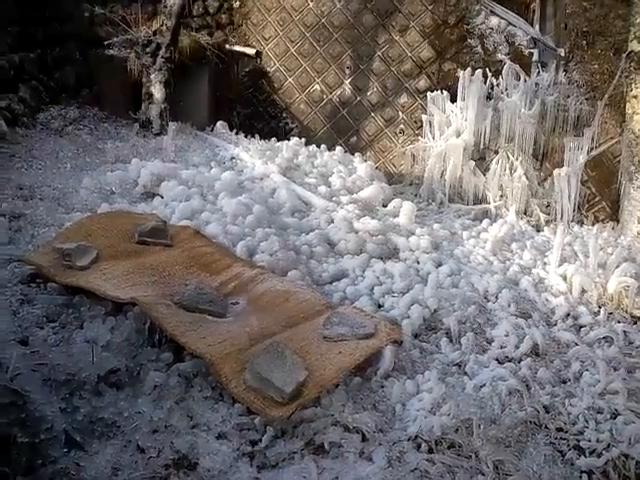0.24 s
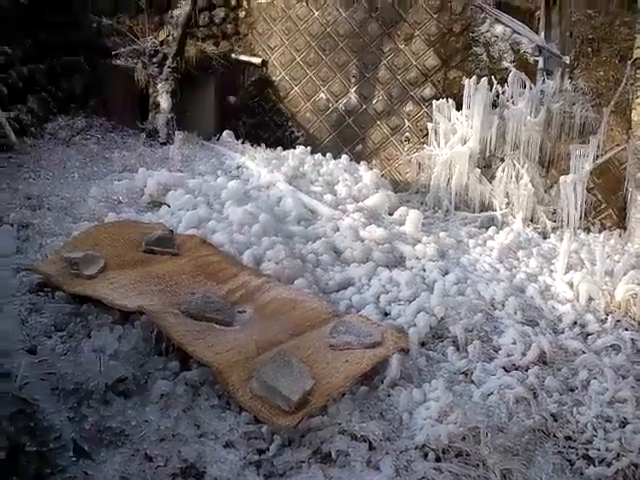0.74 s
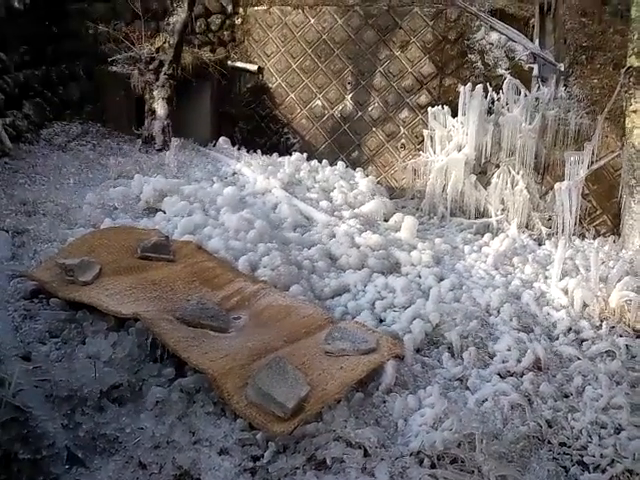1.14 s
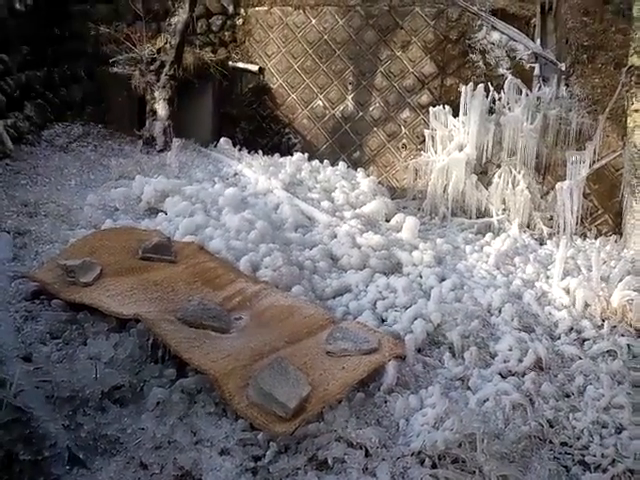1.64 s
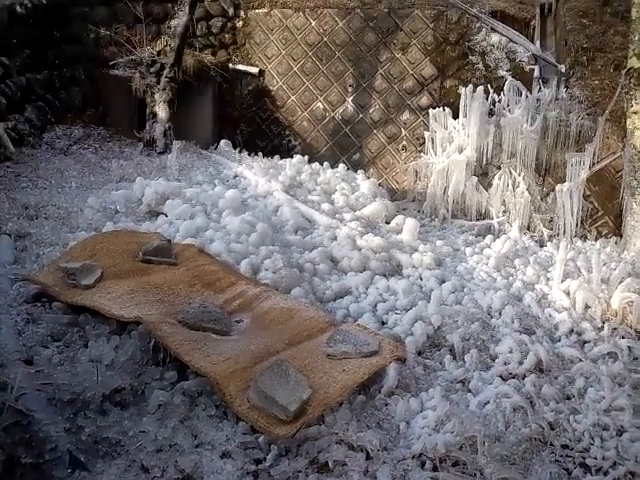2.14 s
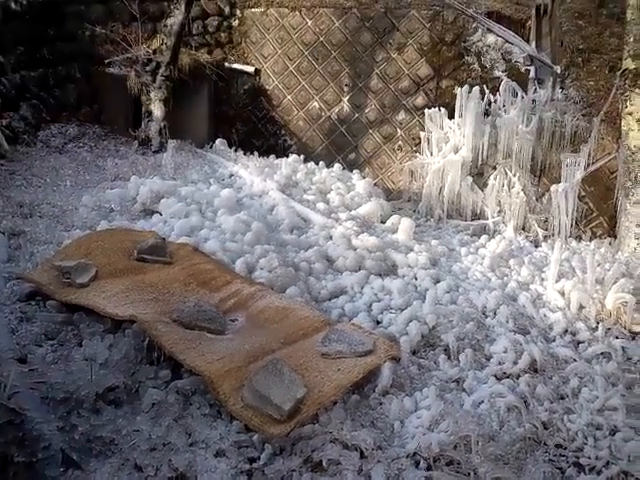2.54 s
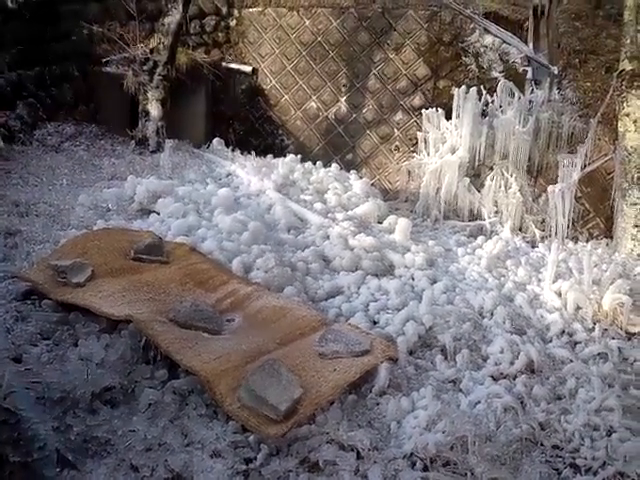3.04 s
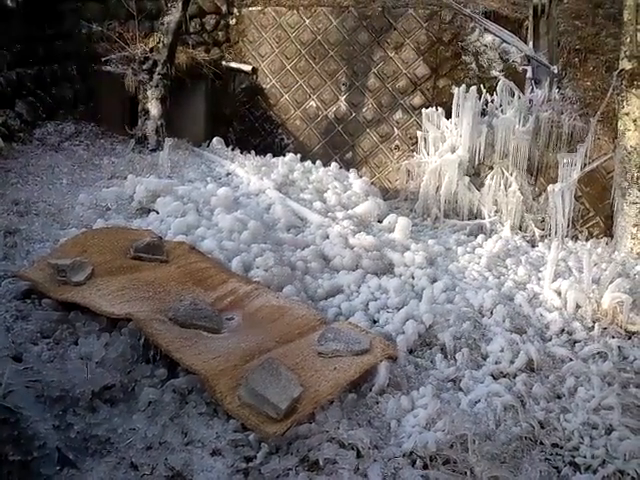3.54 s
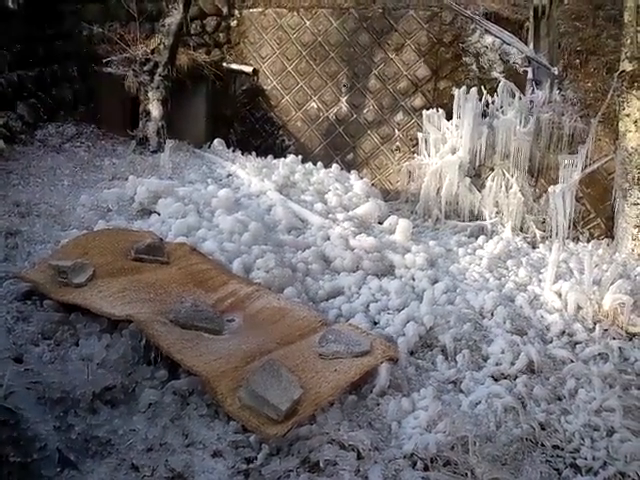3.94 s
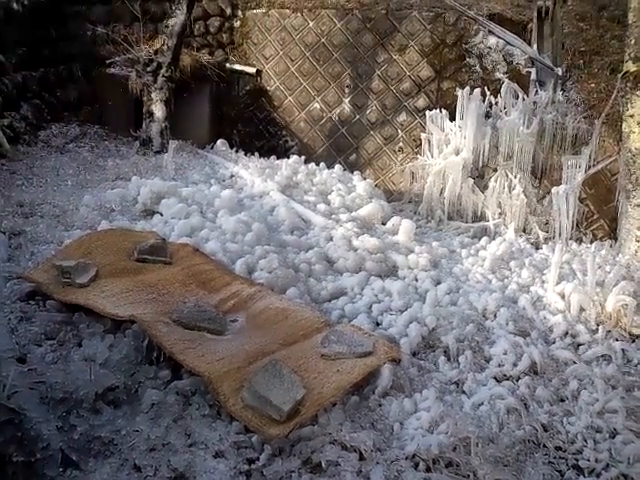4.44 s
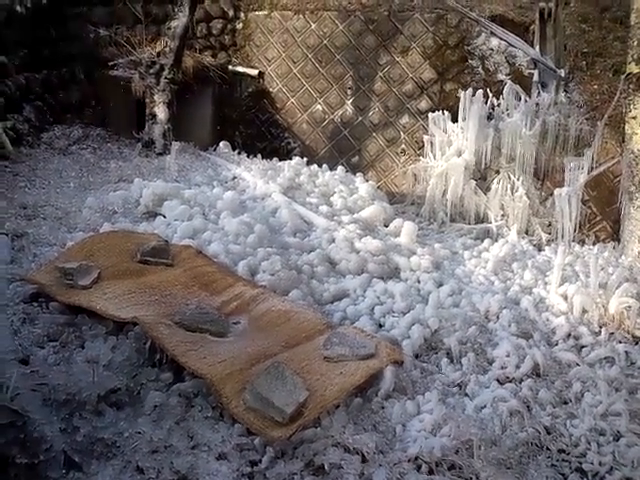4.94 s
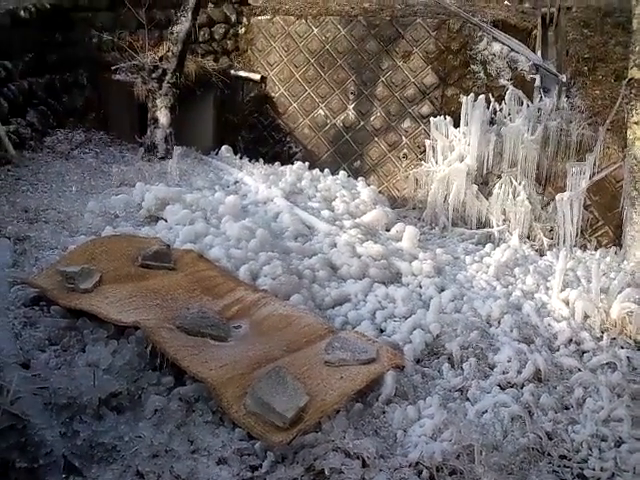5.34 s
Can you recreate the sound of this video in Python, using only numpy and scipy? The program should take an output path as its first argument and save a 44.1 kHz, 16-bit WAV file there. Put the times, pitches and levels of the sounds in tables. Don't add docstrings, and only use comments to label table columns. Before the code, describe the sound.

Pressurised water hisses steadily from a leaking pipe outdoors, bright and slightly glittery, with a few dull handling knocks and late wind buffeting.

```python
import sys
import numpy as np
from scipy import signal
from scipy.io import wavfile
from scipy.ndimage import uniform_filter1d

SR = 44100
rng = np.random.default_rng(int(sys.argv[2]) if len(sys.argv) > 2 else 0)


def boost(x):
    u = np.asarray(x, float) / 20
    return 10 ** u


def wav_out(sig):
    wavfile.write(sys.argv[1], SR, np.round(np.clip(np.atleast_2d(sig).T, -1, 1) * 32767).astype(np.int16))


N = 246519


def evened(x):
    return x / np.sqrt(np.mean(x ** 2) + 1e-20)


def read(points, hz):
    f, value = np.transpose(points)
    return np.interp(np.log(hz + 1), np.log(f + 1), value)


def over_time(table):
    s, level_db = np.transpose(table)
    return boost(np.interp(np.arange(N) / SR, s, level_db))


def fluctuation(count, size):
    return evened(uniform_filter1d(rng.standard_normal(count), size=size))


def noise(field_db, size=1024):
    t = np.arange(4 * N // size + 5) * size / 4 / SR
    hz = np.fft.rfftfreq(size, 1 / SR)
    real, imaginary = rng.standard_normal((2, len(hz), len(t)))
    lines = (real + 1j * imaginary) * boost(field_db(hz, t))
    _, sound = signal.istft(lines, nperseg=size, noverlap=size - size // 4)
    return evened(sound[:N])


def jet(patchy_db=0.5, sputter_db=-0.01, waver_db=0.78, trim_db=0.34):
    # t/s, level/dB
    jet_pressure = [(0.0, -30), (0.35, -31.5), (0.7, -32), (1.0, -32), (1.25, -32.5), (1.482, -32),
                    (1.509, -31.5), (1.79, -34), (1.978, -31), (2.267, -33.5), (2.441, -30.5), (3.109, -33),
                    (3.221, -32), (4.589, -33.5), (4.66, -34.5), (4.789, -30.5), (4.921, -33), (5.59, -30)]
    # f/Hz, density/dB
    jet_colour = [(120, -38), (350, -26), (700, -17.5), (1100, -15.5), (1600, -8.5), (2500, -4.5),
                  (4000, -4.5), (5700, -1), (7000, -6), (8000, 0), (9000, -31.5)]
    # f/Hz, width/Hz, level at the start/dB, level at the end/dB
    echo_comb = [(478, 120, -0.5, -6), (653, 53, -6.5, -4), (817.6, 110, -4, -6.5),
                 (1119.7, 100, -6.5, -5.5), (1408, 90, -0.5, -4), (1782, 120, -4, 0), (2155, 100, -7.5, -3),
                 (2370, 70, -7.5, 2.5), (2529, 110, 4.5, 7), (2834, 90, -2, 2.5), (3088, 170, -8.5, -8),
                 (3368, 110, 2.5, 3.5), (3815, 47, -2, -20), (3931, 160, -6, -6), (4070, 60, 1, -5.5),
                 (4283, 73, 3.5, -0.5), (4570, 66, -2.5, -5), (4840, 57, -6, -11.5), (5127, 150, 4.5, 3.5),
                 (5187, 43, -2.5, -3.5), (5310, 150, -3.5, -3.5), (5660, 170, 2.5, 1), (5920, 110, 2, 3.5),
                 (6010, 190, -5.5, 0.5), (6230, 110, 0.5, -0.5), (6190, 57, 5.5, -2), (6330, 79, -2, -0.5),
                 (6260, 120, 0.5, 2.5), (6438, 230, -1.5, -5), (6676, 87, 2, 3.5), (6860, 83, -9, -7),
                 (6970, 86, 5, 3.5), (6990, 78, -5.5, -1.5), (7120, 40, -3.5, 5.5), (7297, 120, -4, -7.5),
                 (7510, 100, 5, 2), (7690, 60, 0, -2.5), (7540, 64, -5, -0.5), (7780, 160, 1.5, -2.5)]
    body_follows, fizz_follows = 0.27, 0.75
    s, level_db = np.transpose(jet_pressure)

    def field_db(hz, t):
        drift = np.clip((t - 1.9) / 1.5, 0, 1)
        comb = 0
        for f, width, first_db, last_db in echo_comb:
            bump = np.exp(-(2 * (hz - f) / width) ** 2)
            comb = comb + np.outer(bump, first_db + (last_db - first_db) * drift)

        change_db = np.interp(t, s, level_db - level_db.mean())
        body = 1 / (1 + (hz / 3000) ** 8)
        fizz = 1 / (1 + (6500 / (hz + 1)) ** 16)
        steadier = np.outer((body_follows - 1) * body + (fizz_follows - 1) * fizz, change_db)

        waver = np.outer(fizz, fluctuation(len(t), 8))
        chance = rng.standard_normal((len(hz), len(t)))
        across_pitch = uniform_filter1d(chance, size=10, axis=0)
        patches = evened(uniform_filter1d(across_pitch, size=14, axis=1))
        sputter = fluctuation(len(t), 4)
        unsteady = waver_db * waver + patchy_db * patches + sputter_db * sputter
        return read(jet_colour, hz)[:, None] + comb + steadier + unsteady

    return over_time(jet_pressure) * boost(trim_db) * noise(field_db, size=2048)


def yard():
    # f/Hz, density/dB
    yard_colour = [(25, -5), (55, -5), (90, -13), (130, -3), (220, -1.5), (450, -7.5), (900, -15),
                   (1300, -37.5)]
    return boost(-52.5) * noise(lambda hz, t: read(yard_colour, hz)[:, None])


def wind(lumpy_db=2.5):
    # t/s, level/dB
    gusts = [(0.0, -63.5), (0.53, -57.5), (1.38, -57.5), (1.6, -65), (2.57, -62.5), (3.1, -51.5),
             (3.6, -44.5), (4.1, -41.5), (4.7, -47), (5.0, -53.5), (5.59, -41)]
    # f/Hz, density/dB
    wind_colour = [(15, -2), (35, 0.5), (55, 5.5), (100, -5.5), (200, -15.5), (400, -22.5), (900, -48)]

    def field_db(hz, t):
        return read(wind_colour, hz)[:, None] + lumpy_db * fluctuation(len(t), 5)

    return over_time(gusts) * noise(field_db)


def add(mix, s, db, hz, rise_s, t60_s, direction):
    near = slice(round((s - .05) * SR), round((s + .15) * SR))
    u = (np.arange(N) / SR)[near] - s
    rise = np.exp(-(u / rise_s) ** 2 / 2)
    decay = boost(-60 * u / t60_s)
    shape = np.where(u < 0, rise, decay)
    mix[near] += np.sign(direction) * boost(db) * shape * np.cos(2 * np.pi * hz * u)


def knocks():
    # crest t/s, crest level/dB, f/Hz, push direction/sign
    finger_knocks = [(0.3070, -36, 397, 1), (0.3270, -22, 348, -1), (0.3303, -21.5, 114, 1),
                     (2.770, -32, 296, -1), (2.7716, -29, 300, 1), (2.7856, -29.5, 520, 1),
                     (2.7915, -33, 330, 1), (2.8074, -28, 330, -1), (2.8100, -21.5, 200.7, 1),
                     (2.8115, -17, 355, -1), (2.8163, -29.5, 1150, -1), (2.8163, -14, 677, -1),
                     (2.8245, -22, 218.6, -1), (2.8287, -28, 788, 1), (2.8311, -23.5, 329, -1),
                     (2.833, -28.5, 925, 1), (2.8341, -22.5, 97.3, 1), (2.8361, -26.5, 400, 1),
                     (2.837, -24.5, 301, -1), (2.8425, -22, 380, -1), (2.8463, -25, 130, 1),
                     (2.8485, -23.5, 451, 1), (2.8489, -27.5, 603, -1), (2.85, -24, 240, -1),
                     (2.853, -19.5, 310, 1), (4.8774, -35, 250, 1), (4.8877, -31, 497, -1),
                     (4.8926, -33.5, 200, -1), (4.9132, -26, 480, 1), (4.921, -14, 409.7, -1),
                     (4.9203, -24.5, 850, -1), (4.9232, -19.5, 123, 1), (5.450, -28.5, 106.5, 1),
                     (5.5818, -23.5, 292, 1), (5.5843, -20.5, 167.7, -1), (5.5905, -25, 149.2, -1)]
    rise_turns, ring_turns = 0.34, 2.1
    out = np.zeros(N)
    for s, db, hz, direction in finger_knocks:
        add(out, s, db, hz, rise_turns / hz, ring_turns / hz, direction)
    return out


def rings():
    # crest t/s, crest level/dB, f/Hz, t60/ms
    ringing_taps = [
        (0.307, -40, 377, 20),
        (2.779, -31, 621, 50),
        (2.8030, -31, 840, 20),
        (2.816, -22, 686, 22),
        (4.055, -33.5, 250, 20),
        (5.359, -37, 325, 12),
        (5.363, -40.5, 801, 11),
        (5.3655, -28.5, 191.3, 15),
        (5.3706, -22, 171.6, 120),
        (5.5845, -40, 418, 30),
    ]
    rise_turns = .7
    out = np.zeros(N)
    for s, db, hz, t60_ms in ringing_taps:
        add(out, s, db, hz, rise_turns / hz, t60_ms / 1000, 1)
    return out


def bumps():
    # crest t/s, crest level/dB, f/Hz
    housing_bumps = [(0.566, -33.5, 114.6), (0.795, -33.5, 113.7), (1.151, -31, 134.4), (1.228, -30.5, 133),
                     (1.3375, -36, 123), (1.418, -38, 131), (1.488, -32.5, 126), (2.692, -36, 116),
                     (3.376, -32, 115), (3.533, -42, 78.3), (3.712, -32, 57.6), (3.811, -23.5, 80.2),
                     (3.998, -29, 61.3), (4.029, -21, 95.6), (4.067, -26, 195.6), (4.091, -31.5, 133),
                     (4.099, -32.5, 167.6), (4.120, -27.5, 81), (4.136, -36, 151), (4.221, -33, 165.7),
                     (4.294, -34, 189), (4.156, -26.5, 68.6), (4.1885, -24, 100), (4.27, -28.5, 113),
                     (4.388, -40, 90.5), (4.438, -33.5, 68), (4.498, -31, 55), (4.576, -30, 100.5),
                     (4.685, -29.5, 58.6)]
    rise_turns, ring_turns = .48, 3.2
    out = np.zeros(N)
    for s, db, hz in housing_bumps:
        add(out, s, db, hz, rise_turns / hz, ring_turns / hz, -1)
    return out


def rubs(grain_db=10.0):
    # start t/s, length/s, level/dB
    rub_strokes = [
        (2.764, 0.043, -42),
        (4.864, 0.049, -50),
        (5.335, 0.037, -52),
    ]
    # f/Hz, density/dB
    rub_colour = [(60, -24), (250, 0), (600, -0.5), (1100, -13), (1600, -19), (3000, -45)]
    t = np.arange(N) / SR
    stroke = np.zeros(N)
    for s, length, db in rub_strokes:
        stroke += boost(db) * np.sin(np.pi * np.clip((t - s) / length, 0, 1))
    grain = boost(grain_db * fluctuation(N, 120))
    return stroke * grain * noise(lambda hz, t: read(rub_colour, hz)[:, None])


def scene():
    mix = jet() + yard() + wind() + knocks() + rings() + bumps() + rubs()
    return mix[None]


def coarse_step(lines, band_widths):
    # f/Hz, step/dB
    step_over_band = [(50, 1.5), (250, 2.5), (500, 4.5), (900, 7.5), (1400, 8), (2200, 8.5), (4000, 10),
                      (7900, 10)]
    mask_db_per_band, mask_most_db = 1.6, 5.0
    least_step_db, block_swing_db, band_swing_db = -33.6, 1.2, 0.8
    starts, band = np.cumsum(band_widths) - band_widths, np.arange(len(band_widths))
    power = np.add.reduceat(lines ** 2, starts, axis=1) / band_widths
    centre_hz = (starts + band_widths / 2) * 8000 / lines.shape[1]
    wanted_db = 10 * np.log10(power + 1e-14) + read(step_over_band, centre_hz)

    distance = abs(band[:, None] - band)
    masked_db = (wanted_db[:, None] - mask_db_per_band * distance).max(axis=2)
    masked_db = np.minimum(masked_db, wanted_db + mask_most_db)

    chance = rng.standard_normal((len(lines), len(band) + 1))
    least_db = least_step_db + block_swing_db * np.clip(chance[:, :1], -2, 1.3)
    swing = evened(uniform_filter1d(chance[:, 1:], size=3, axis=1))
    step_db = np.maximum(masked_db, least_db) + band_swing_db * swing
    return np.repeat(2 ** (np.round(step_db / 1.505) / 4), band_widths, axis=1)


def glitter(x):
    band_widths = np.repeat([8, 12, 16, 20, 24, 28, 32, 36, 40, 44, 48, 52, 56, 60, 64],
                   [11, 9, 4, 3, 2, 2, 1, 1, 2, 1, 1, 1, 1, 1, 3])
    block, block_start = 1024, 772
    whole = np.pad(x, (0, -N % 441))
    low = signal.resample(whole, len(whole) // 441 * 160)
    low = np.pad(low, (block - block_start, 2 * block))

    n, k = np.arange(2 * block), np.arange(block)
    basis = np.cos(np.pi / block * np.outer(n + .5 + block / 2, k + .5)) * np.sqrt(2 / block)
    basis *= signal.windows.kaiser_bessel_derived(2 * block, 4 * np.pi)[:, None]
    at = np.arange(0, len(low) - 2 * block, block)[:, None] + n
    lines = low[at] @ basis

    step = coarse_step(lines, band_widths)
    rounded = step * np.round(lines / step)
    out = np.zeros(len(low))
    np.add.at(out, at, rounded @ basis.T)
    return out[block - block_start:]


def widen(low):
    soft = signal.firwin(441 * 40 + 1, 8150.0, window=("kaiser", 9.0), fs=441 * 16000)
    delayed = np.pad(soft, (441, 0))
    return signal.resample_poly(low, 441, 160, window=delayed)[:N]


def top_cut(x):
    return signal.sosfilt(signal.butter(12, 9060, fs=SR, output="sos"), x)


def record(dry):
    wide = widen(glitter(dry[0]))
    return top_cut(wide[None])


dry = scene()
out = record(dry)
wav_out(out)
```